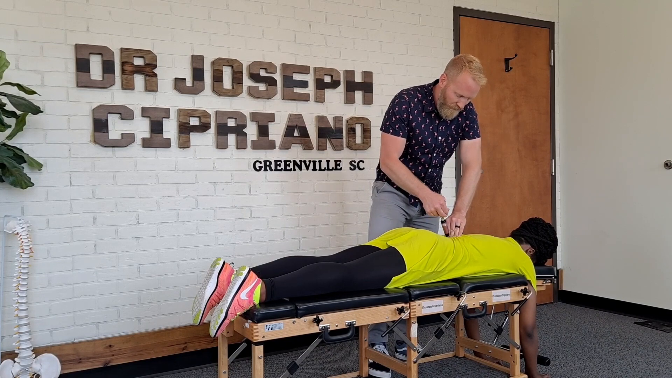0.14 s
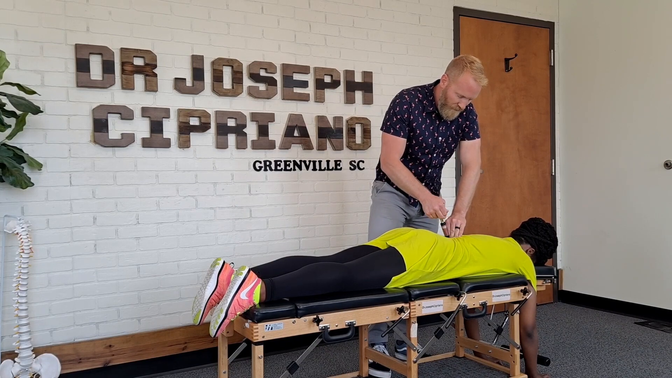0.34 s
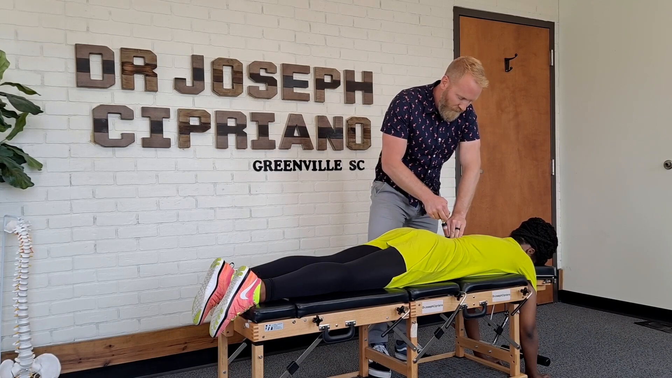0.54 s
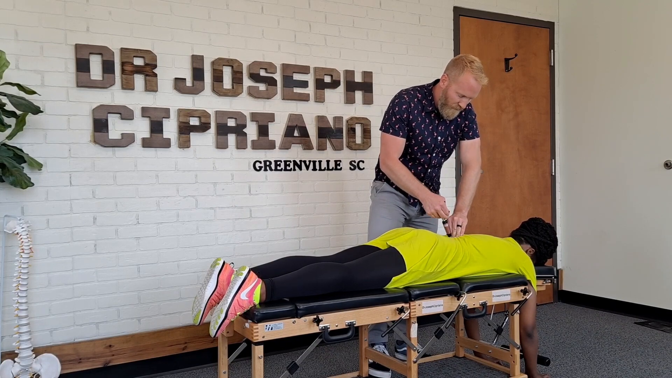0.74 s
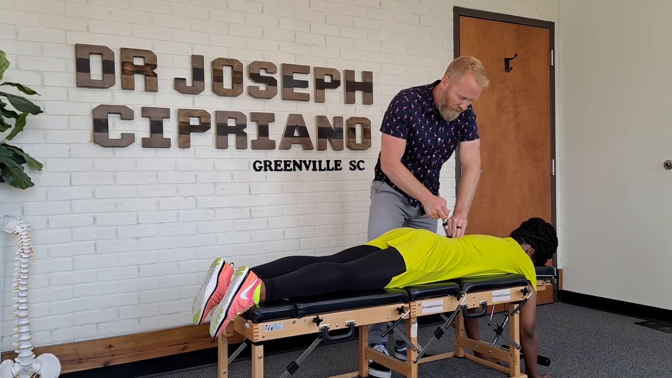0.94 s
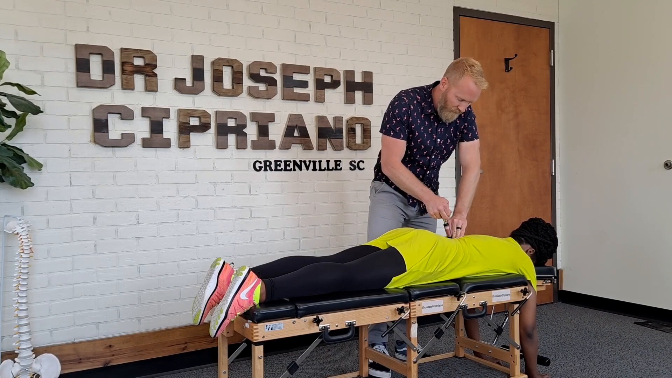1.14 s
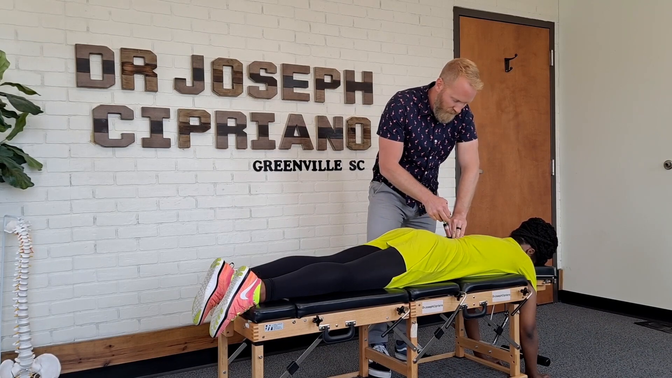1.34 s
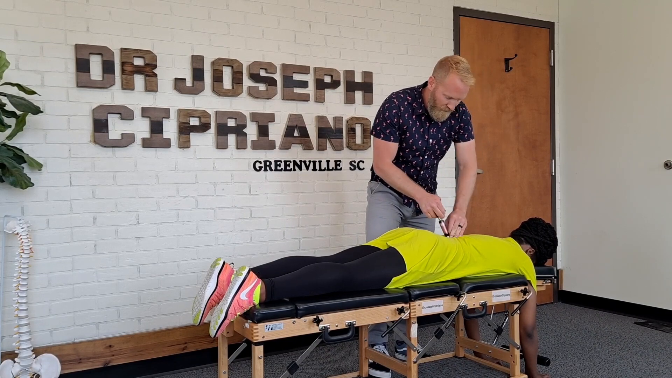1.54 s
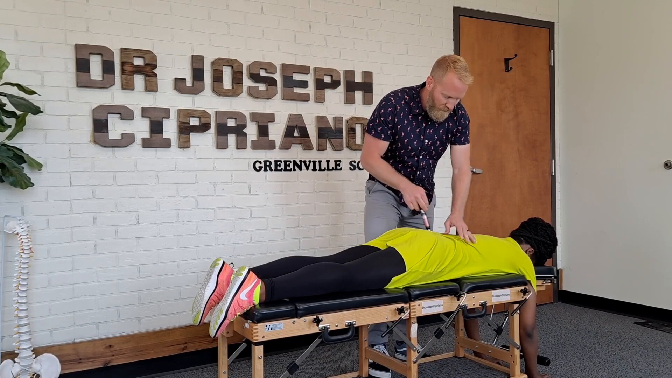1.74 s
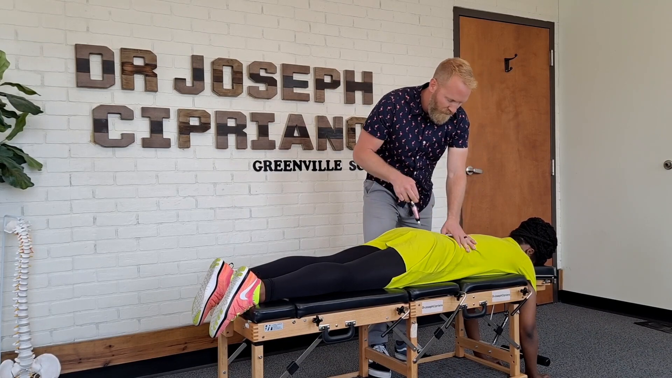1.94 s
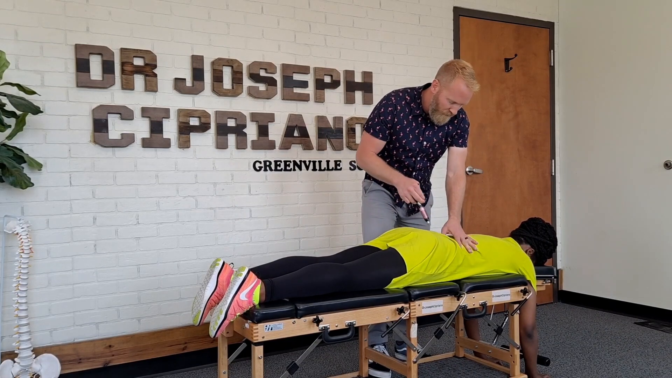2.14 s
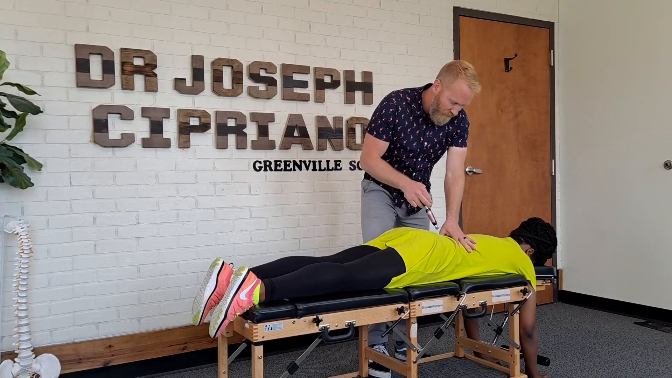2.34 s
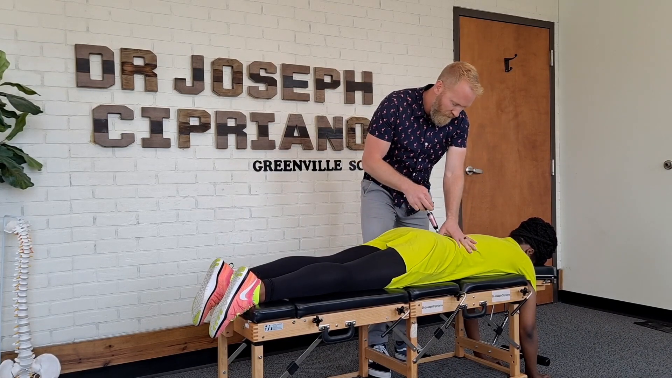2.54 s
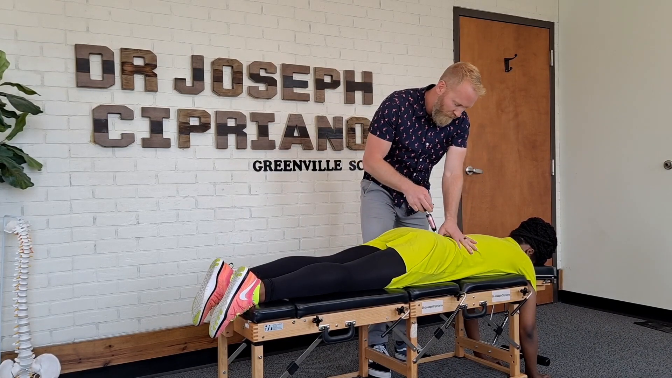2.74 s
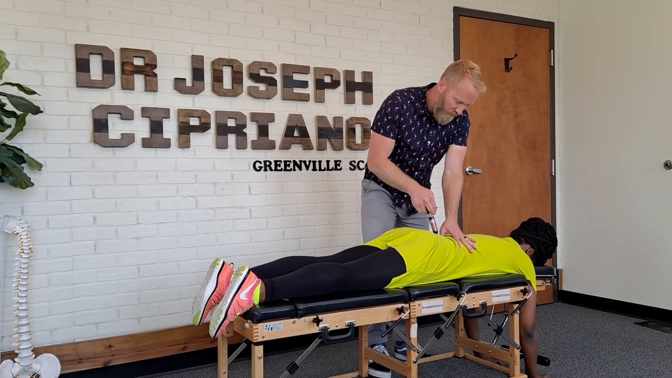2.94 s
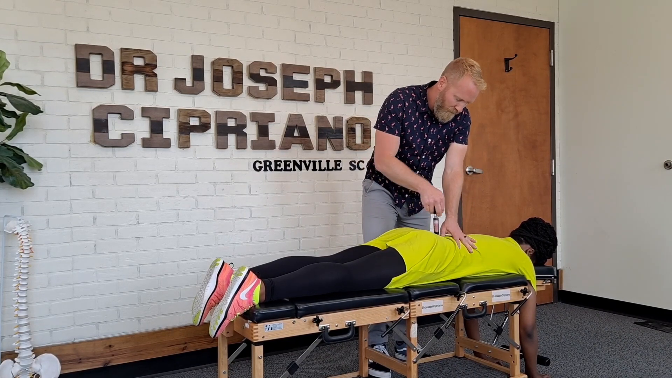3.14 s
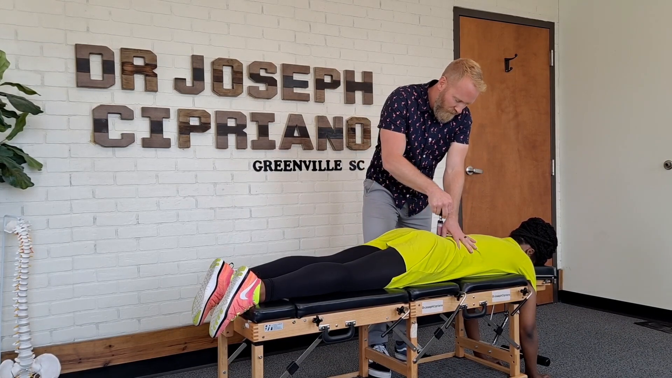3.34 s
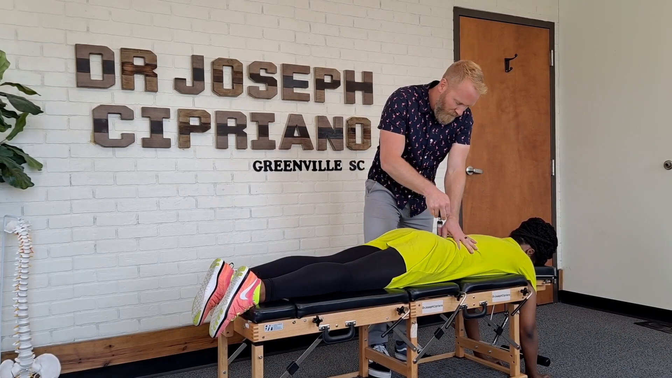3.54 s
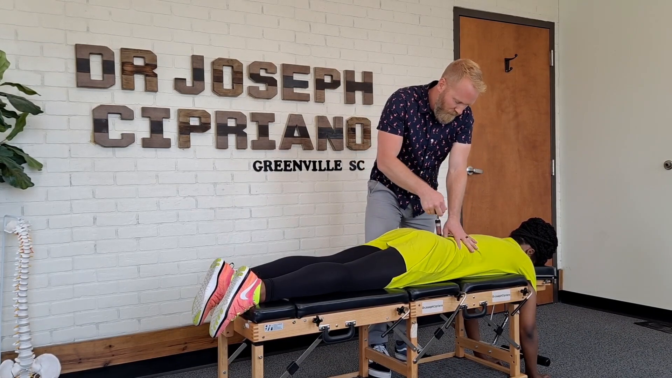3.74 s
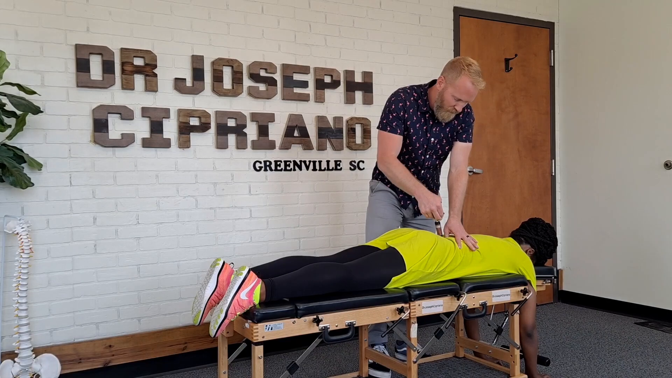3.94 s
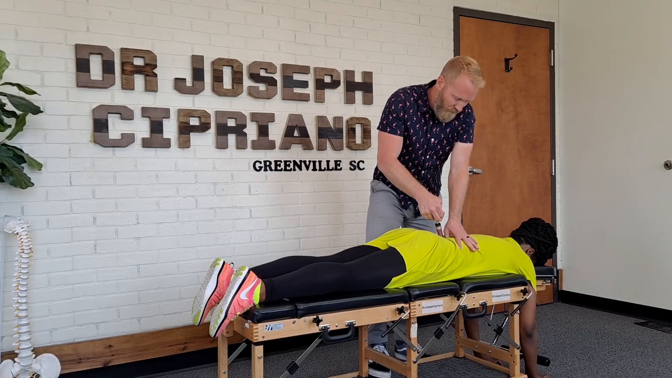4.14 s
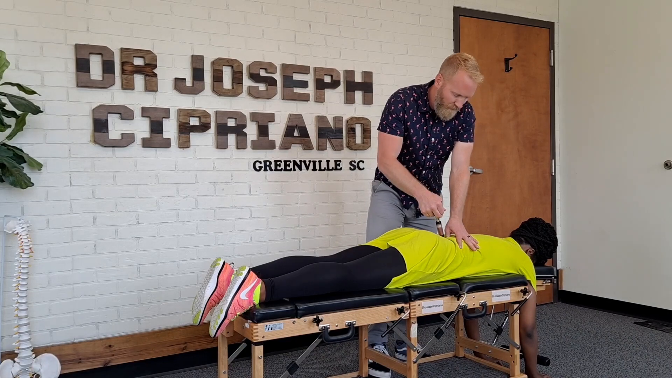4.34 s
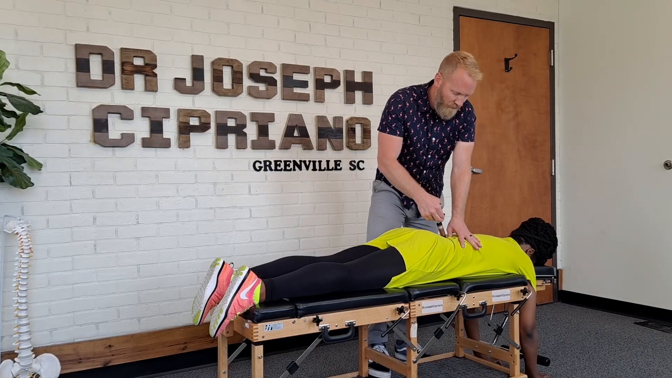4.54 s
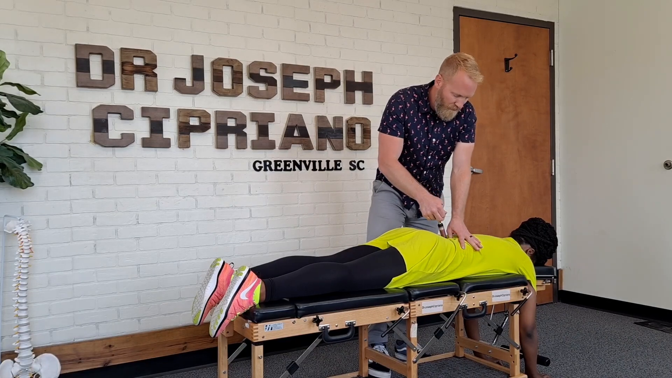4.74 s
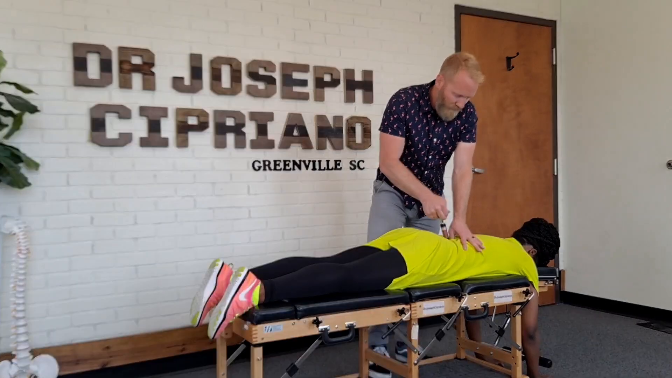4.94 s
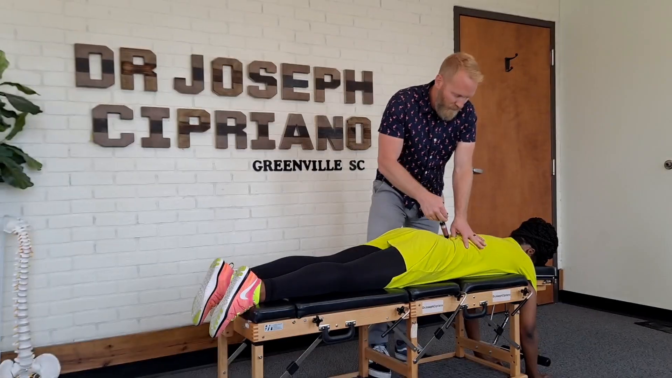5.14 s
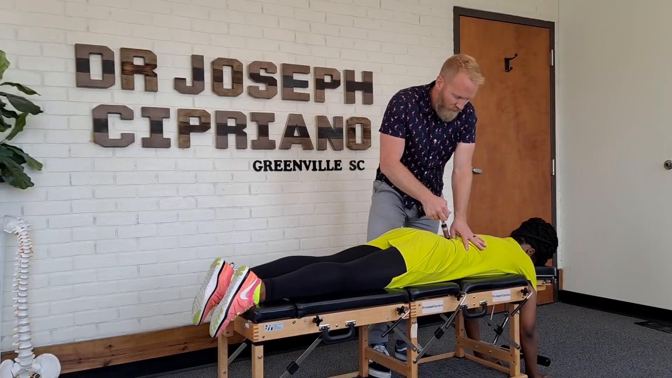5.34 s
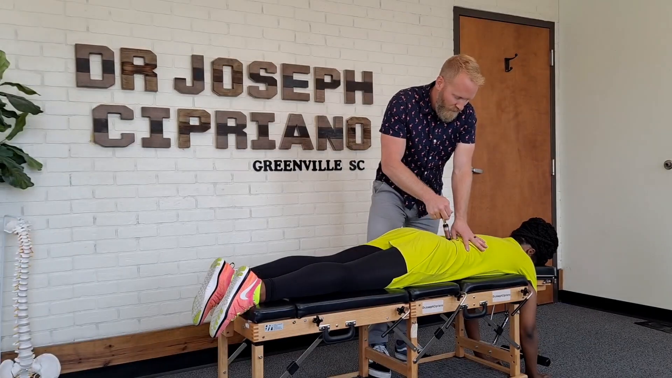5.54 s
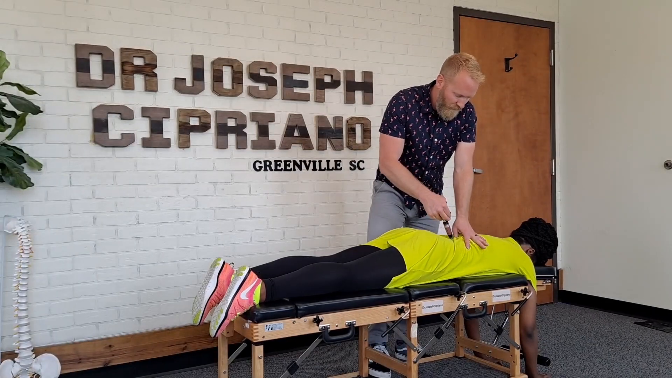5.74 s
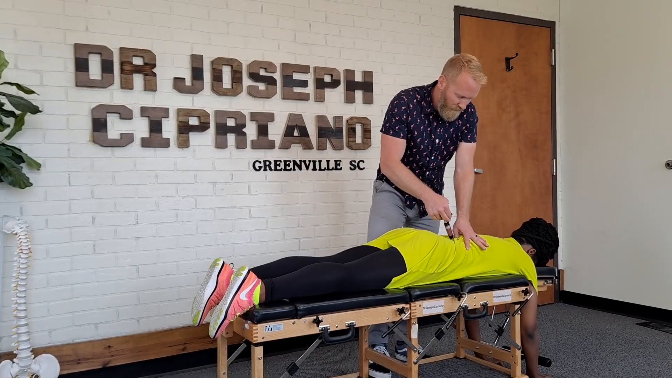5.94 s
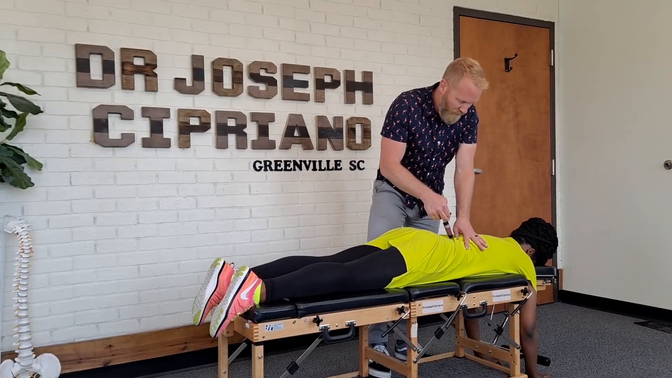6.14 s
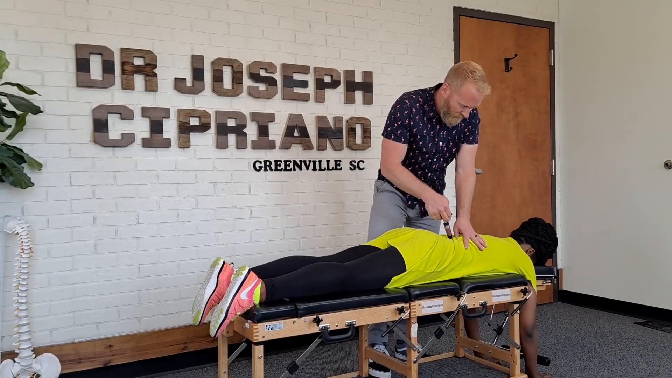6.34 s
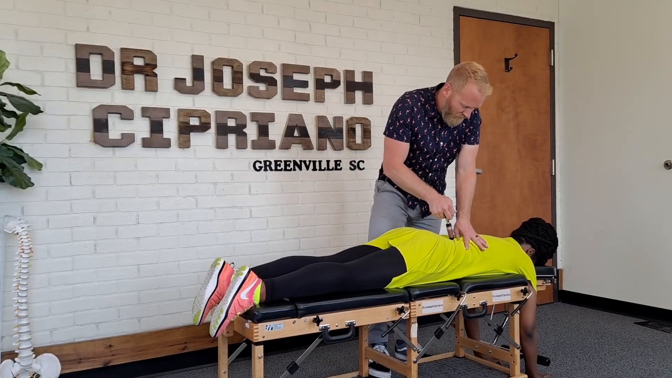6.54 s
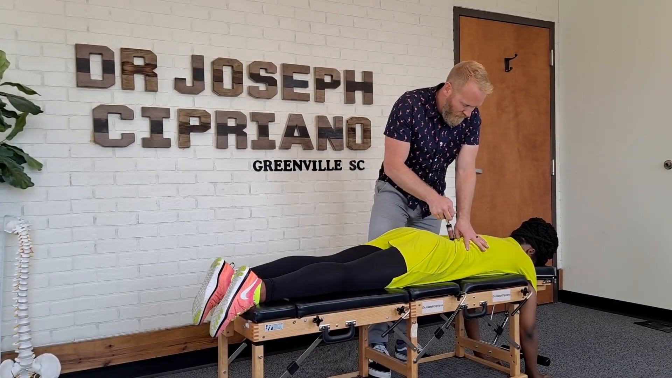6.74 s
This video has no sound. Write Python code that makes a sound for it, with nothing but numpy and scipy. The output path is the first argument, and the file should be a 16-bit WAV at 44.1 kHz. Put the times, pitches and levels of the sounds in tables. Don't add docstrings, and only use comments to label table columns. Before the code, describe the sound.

In a small hard-walled room, a low air-handler hum throbs continuously. A spring-loaded hand tool fires four sharp, dry cracks in the first stretch, then pauses for about two seconds with only soft ticks and faint creaks. Eight more cracks follow in uneven pairs, then a last one near the end. High latch pings and short echoes accompany them, heard from a few metres away in stereo.

```python
import sys
import numpy as np
from scipy import signal
from scipy.fft import rfft, irfft
from scipy.io import wavfile
from scipy.ndimage import uniform_filter1d

SR = 44100
rng = np.random.default_rng(int(sys.argv[2]) if len(sys.argv) > 2 else 0)


def makeup_ratio(level_db):
    decades = np.asarray(level_db, float) / 20
    return 10 ** decades


def transcribe(signal):
    frames = np.atleast_2d(signal).T
    limited = np.clip(frames, -1, 1)
    pcm = np.round(limited * 32767).astype(np.int16)
    wavfile.write(sys.argv[1], SR, pcm)


N = 299439

# pitch_hz, level_db (per Hz)
AIR_COLOUR = [(15, -43), (25, -32), (42, -8.5), (64, 2.5), (142, -20.5), (167, -17.5), (196, -26),
              (243, -16.5), (344, -31), (383, -28.5), (427, -33), (673, -41.5), (1180, -61), (13800, -71.5),
              (15000, -70.5)]
# pitch_hz, likeness_0_to_1
AIR_LIKENESS = [(30, .5), (50, 0.99), (250, 1), (400, 0.3), (600, 0.5), (1400, 0), (15000, .05)]
# pitch_hz, left_minus_right_db
AIR_BALANCE = [(120, -2), (400, -2.5), (700, -9.5), (2400, -1.5), (15000, 0)]
# pitch_hz, level_db, width_hz
MOTOR_LINES = [
    (162.5, -54, 6.1),
    (192.4, -54, 24),
    (2280, -87.5, 560),
]
# pitch_hz, level_db
WINDING_HUM = [
    (120, -47.5),
    (240, -53.5),
]
# start_s (the peak), level_db, swell_s
DUCT_SURGES = [(0.13, -39, 0.23), (0.34, -32.5, 0.11), (0.64, -36.5, .2), (1.25, -39, 0.26),
               (1.76, -33, 0.12), (1.93, -35, .08), (2.06, -30.5, 0.062), (2.19, -37, 0.065),
               (2.4, -45, .12), (2.93, -34.5, .25), (3.33, -39, 0.7), (3.79, -44, 0.065),
               (3.91, -33.5, 0.093), (4.2, -43, 0.55), (4.41, -37.5, 0.091), (4.55, -34.5, 0.052),
               (4.68, -35, 0.082), (4.98, -36.5, .11), (5.18, -34, .17), (5.63, -37.5, .15),
               (5.88, -41.5, 0.078), (6.12, -35.5, .1), (6.27, -35.5, 0.074), (6.43, -31.5, 0.076),
               (6.55, -33.5, .05), (6.72, -35, 0.12)]
AIR_DB, DUCT_REST_DB, SURGE_RISE_DB = -38, -52, 13.5
# pitch_hz, decay_s (to fall 60 dB)
ROOM_DECAY = [(250, 0.49), (700, 0.45), (2000, 0.32), (5000, 0.32), (9000, 0.26), (13000, 0.12)]
PATH_DELAYS = [
    0,
    5.2,
    10.05,
    12.95,
    6.7,
    15.7,
    18.2,
]
# left_db, right_db
PATH_LEVELS = [
    (-6, 0),
    (-3, 0),
    (-9, 0),
    (-10, 0),
    (-3.5, -8),
    (-6, -9),
    (-9, -8),
]
# start_s, length_s, low_plank_db, high_plank_db, slips_per_s
FRAME_CREAKS = [
    (0.063, 0.018, -48.5, -50.5, 580),
    (2.169, 0.084, -61, -83, 176),
    (2.695, 0.016, -58, -64, 270),
    (3.55, 0.077, -62, -58.5, 150),
    (4.27, 0.041, -58, -54.5, 580),
    (4.827, .14, -52.5, -53, 580),
    (5.495, 0.075, -53, -60.5, 580),
    (6.663, 0.063, -49, -53, 174),
]
# pitch_hz, width_hz
PLANK_TONES = [
    (600, 130),
    (900, 140),
]
# start_s, level_db, barrel_db, length_ms
FINGER_TICKS = [(0.3044, -32.5, -14.5, 5.4), (0.9574, -42.5, -1.5, 1.6), (1.195, -39, -7.5, 6),
                (1.5953, -43.5, -9, 9.5), (1.6677, -35.5, -24, 1.7), (1.7691, -53.5, -7.5, 2.3),
                (1.9399, -62, -5, 3), (2.7046, -45, -7, 17), (2.8564, -43.5, -33.5, 3.6),
                (2.9323, -52.5, -31, 2.6), (3.2399, -60.5, -7, 2.7), (3.3283, -52.5, -9.5, 1.5),
                (3.4191, -44, -23, 2.1), (3.972, -34, -33, 4.4), (4.0524, -41.5, -7, 3),
                (4.5617, -32.5, -21, 3.4), (4.6521, -37.5, -3.5, 13), (4.925, -37, 0.5, 9),
                (5.2942, -35, -8.5, 4), (6.5144, -44, -8, 2.4)]
# start_s, level_db, barrel_db, length_ms
SPRING_TICKS = [(0.3644, -41.5, -5, 3.7), (0.8904, -46, -19, 2.6), (3.3852, -44.5, -4, 7.3),
                (3.6433, -35.5, -7.5, 6.7), (5.2074, -33.5, -11, 2.7), (5.824, -35, -9.5, 2.7),
                (6.494, -53, -6, 3.5)]
GRIP_PING_DB, COIL_PING_DB = -21.5, 2
# start_s (of the door echo), level_db, barrel_db, rattle_db
LATCH_PINGS = [(0.0193, -24.5, -11.5, -16), (0.5936, -24, -31.5, -15.5), (1.1577, -27.5, -20.5, -20.5),
               (1.4171, -24.5, -38, -16), (4.262, -22, -29.5, -18), (4.8876, -23, -28.5, -18),
               (5.5188, -21.5, -30, -17), (6.7504, -22.5, -36, -17)]
# pitch_hz, level_db, decay_s (to fall 60 dB)
RINGING_TONES = [(244, -28.5, 0.024), (623, -27.5, 0.023), (750, -23, 0.0089), (830, -24.5, 0.016),
                 (2020, -25, 0.004), (2130, -23, 0.03), (2294, -27, 0.069), (2800, -37.5, 0.019)]
# pitch_hz, level_db
CRACK_COLOUR = [(150, -29.5), (430, -22), (540, -15.5), (1000, -8.5), (1600, -9), (2150, 4.5), (2500, -1),
                (3000, -4.5), (5000, -5.5), (7500, -4.5), (10000, -5), (12800, -5), (15000, 0)]
# start_s, strength_db, microphone_db, door_db, side_wall_db
SHOT_LIST = [(0.0978, -26.5, 13, 10.5, 11.5), (0.4281, -26.5, 10.5, 15, 13), (0.672, -26.5, 11.5, 13.5, 13),
             (1.2509, -26, 14, 13, 12.5), (3.4739, -27.5, 16, 19.5, 11.5), (3.7364, -29, 11.5, 16.5, 10),
             (4.1167, -27.5, 12.5, 15, 16), (4.3573, -26.5, 9.5, 15, 13), (4.7346, -26, 8.5, 18, 15.5),
             (4.99, -25.5, 12, 14, 16), (5.3751, -25.5, 14, 15, 18), (5.6162, -26, 14.5, 15.5, 14),
             (6.5742, -24, 13.5, 17, 14.5)]
FLOOR_AIM_DB = 10
TABLE_LOAD_DB = 0.87
LOW_CUT_HZ, TOP_HZ = 34.5, 14550
LEFT_PORT_HZ, LEFT_DULL_HZ = 95.6, 12360


def on_log(points, hz):
    f, value = np.transpose(points)
    return np.interp(np.log(hz + 1), np.log(f), value)


def unit(x):
    return x / np.sqrt(np.mean(x ** 2))


def band(x, hz, width):
    return signal.lfilter(*signal.iirpeak(hz, hz / width, fs=SR), x)


def causal(points, size=512):
    log_gain = on_log(points, np.fft.rfftfreq(size, 1 / SR)) * np.log(10) / 20
    cepstrum = irfft(log_gain)
    cepstrum[1:size // 2] *= 2
    cepstrum[size // 2 + 1:] = 0
    return irfft(np.exp(rfft(cepstrum)))


def add(track, s, sound):
    k = max(int(s * SR), 0)
    track[..., k:k + sound.shape[-1]] += sound[..., :track.shape[-1] - k]


def impulse(size):
    click = np.zeros(size)
    click[0] = 1
    return click


def stereo_noise(mid, side, like):
    return np.sqrt(1 + like) * mid + np.sqrt(1 - like) * side * np.array([[1], [-1]])


def narrow(hz, width):
    return unit(band(band(rng.standard_normal(N), hz, width), hz, width))


def throb(t):
    s, db, swell = np.transpose(DUCT_SURGES)[:, :, None]
    surges_db = db - SURGE_RISE_DB * np.abs(t - s) / swell
    return np.maximum(surges_db.max(axis=0), DUCT_REST_DB)


def air_handler():
    t = np.arange(N) / SR
    hz = np.fft.rfftfreq(N, 1 / SR)
    like = np.clip(on_log(AIR_LIKENESS, hz), 0, 1)
    mid, side = rfft(rng.standard_normal((2, N)))
    pair = stereo_noise(mid, side, like)
    pan = makeup_ratio(on_log(AIR_BALANCE, hz) * np.array([[.5], [-.5]]))
    gap = 1 - 0.87 * np.exp(-((hz - 60) / 14) ** 2)
    air = unit(irfft(pair * pan * gap * makeup_ratio(on_log(AIR_COLOUR, hz)), N)) * makeup_ratio(AIR_DB - 1.5)

    wander = uniform_filter1d(uniform_filter1d(rng.standard_normal(N), size=3000), size=3000)
    duct_cycles = 59.5 * t + np.cumsum(3.6 * unit(wander)) / SR
    duct = np.sin(2 * np.pi * duct_cycles) * makeup_ratio(throb(t) + 4.0)

    motor = sum(makeup_ratio(db) * narrow(f, width) for f, db, width in MOTOR_LINES)
    hum = sum(makeup_ratio(db + 3) * np.sin(2 * np.pi * f * t) for f, db in WINDING_HUM)
    return air + duct * makeup_ratio(3) + motor + hum


def diffuse_field():
    hz = 120 * 2 ** np.arange(0, 7.1, .5)
    t = np.arange(SR // 2) / SR
    decay = 1000. ** (-t / on_log(ROOM_DECAY, hz)[:, None])
    like = np.clip(.8 * on_log(AIR_LIKENESS, hz), 0, 1)[:, None, None]
    bands = np.array([band(rng.standard_normal((2, 1, 2 * SR)), f, f / 1.644) for f in hz])
    mid, side = bands.transpose(1, 0, 2, 3)
    return stereo_noise(mid, side, like) / np.sqrt(2), decay


def puff(rise_ms, fall_ms, size=1024):
    ms = np.arange(size) / SR * 1000
    noise = np.tanh(2 * rng.standard_normal(size))
    burst = noise * (1 - np.exp(-ms / rise_ms)) * np.exp(-ms / fall_ms)
    return unit(burst) / np.sqrt(size)


def room_tail(room, source, contact_ms, tail_db):
    noise, decay = room
    k, t = rng.integers(SR), np.arange(decay.shape[1]) / SR
    decay = decay * makeup_ratio(1.3 * rng.standard_normal((len(decay), 1)))
    clump_db = rng.standard_normal((len(decay), len(t) // 210))
    clumps = makeup_ratio(2.41 * np.repeat(clump_db, 210, axis=1))
    envelope = decay * uniform_filter1d(clumps, size=100)
    tail = np.einsum("bcn,bn->cn", noise[:, :, k:k + len(t)], envelope)
    tail *= 1 - np.exp(-t / (0.0038 + contact_ms[1] / 1000))
    tail *= makeup_ratio(tail_db + np.array([[-18.5], [-17.5]]))
    return signal.fftconvolve(tail, source[None], axes=1)


def place(out, room, s, colour, ring, contact_ms, echo_db, tail_db):
    lesser_db = 2 * rng.standard_normal(len(PATH_LEVELS) - 4)
    aim_db = np.r_[0, echo_db, lesser_db]
    for ms, pair_db, db in zip(PATH_DELAYS, PATH_LEVELS, aim_db):
        for port, port_db in zip(out, pair_db):
            contact = np.convolve(puff(*contact_ms), colour)
            add(port, s + ms / 1000, contact * makeup_ratio(db + port_db))
            add(port, s + ms / 1000, ring * makeup_ratio(db + port_db))
    source = ring.copy()
    add(source, 0, colour)
    add(out, s, room_tail(room, source, contact_ms, tail_db))


def creaks(out, room):
    size = int(.4 * SR)
    for s, length, low_db, high_db, rate in FRAME_CREAKS:
        steps, sizes = rng.standard_normal((2, 128))
        at = np.cumsum(SR / rate * np.exp(.3 * steps))
        swell = np.sin(np.pi * np.clip(at / SR / length, 0, 1))
        slips = np.bincount(np.minimum(at.astype(int), size - 1), swell * makeup_ratio(sizes), size)
        sound = np.zeros(size)
        for (hz, width), db in zip(PLANK_TONES, (low_db, high_db)):
            sound += makeup_ratio(db + 29.0) * band(band(slips, hz, width), hz, 350)
        place(out, room, s, np.zeros(1), sound, (.1, .1), [-3, -3, -3], 8.5)


def ticks(out, room):
    click = impulse(512)
    tones = [(6300, 7300), (2103, 860), (13200, 3200)]  # pitch_hz, width_hz
    grip, body, coil = (band(band(click, hz, width), hz, 3 * width) for hz, width in tones)
    for rows, ping_db in (FINGER_TICKS, GRIP_PING_DB), (SPRING_TICKS, COIL_PING_DB):
        for s, db, barrel_db, ms in rows:
            colour = grip - makeup_ratio(barrel_db + 13) * body - makeup_ratio(ping_db) * coil
            contact_ms = (.2, max(ms, .2))
            place(out, room, s, colour * makeup_ratio(db + 11.0), np.zeros(512), contact_ms, [-2, 0, -2], 0)


def barrel(barrel_db, table_db, size=4096):
    t = np.arange(size) / SR
    chance = rng.standard_normal((len(RINGING_TONES), 2))
    ring = np.zeros(size)
    for (hz, db, t60), (level_chance, pitch_chance) in zip(RINGING_TONES, chance):
        part_db = table_db if hz < 1000 else barrel_db
        tone = np.sin(2 * np.pi * hz * (1 + 0.0022 * pitch_chance) * t)
        ring += makeup_ratio(db + level_chance + part_db) * tone * 1000. ** (-t / t60)
    return ring


def latch(out, room):
    click = impulse(4096)
    ping = -band(band(click, 12200, 2200), 12400, 2600)
    aim_db, tail_db = [-2, 7, -7], -6
    flutter = [(10, 2), (21.4, -2)]  # delay_ms, level_db
    for s, db, barrel_db, rattle_db in LATCH_PINGS:
        rattle = makeup_ratio(db + rattle_db + 24.0) * band(click[:512], 4400, 11000)
        ring = makeup_ratio(db + 18) * ping + makeup_ratio(db + 4.5) * barrel(barrel_db, barrel_db - 7.5)
        place(out, room, s - .0107, rattle, ring, (.2, .8), aim_db, tail_db)
        for ms, flutter_db in flutter:
            add(out, s + ms / 1000, ring * makeup_ratio(flutter_db + np.array([[-9], [0]])))


def shots(out, room):
    crack = causal(CRACK_COLOUR)
    for s, strength_db, direct_db, door_db, wall_db in SHOT_LIST:
        db = strength_db + direct_db
        scrape = np.convolve(puff(.1, 1.6)[220::-1], crack)
        add(out, s - 220 / SR, scrape * makeup_ratio(db + np.array([[8], [12]])))
        echo_db = np.array([FLOOR_AIM_DB, door_db, wall_db]) - direct_db
        slam = crack * makeup_ratio(db + 19.5)
        ring = barrel(0, TABLE_LOAD_DB) * makeup_ratio(db + 1.5)
        place(out, room, s, slam, ring, (.25, .45), echo_db, 8.5 - direct_db)


def scene():
    out, room = air_handler(), diffuse_field()
    for source in (creaks, ticks, latch, shots):
        source(out, room)
    return out


def top_cut(x):
    return signal.sosfilt(signal.butter(12, 15920, fs=SR, output="sos"), x)


def record(dry):
    left = signal.lfilter(*signal.butter(1, [LEFT_PORT_HZ, LEFT_DULL_HZ], "band", fs=SR), dry[0])
    low_cut = signal.butter(3, LOW_CUT_HZ, "high", fs=SR, output="sos")
    ports = signal.sosfilt(low_cut, [left, dry[1]])
    steep = signal.cheby1(9, 1, TOP_HZ, fs=SR, output="sos")
    return top_cut(signal.sosfilt(steep, ports))


dry = scene()
out = record(dry)
transcribe(out)
```